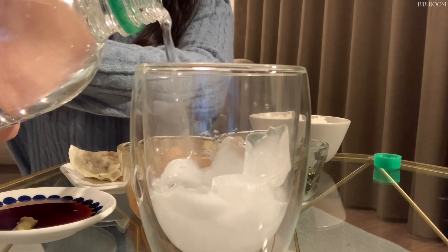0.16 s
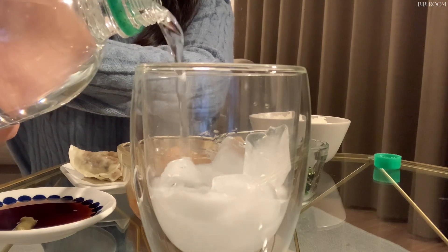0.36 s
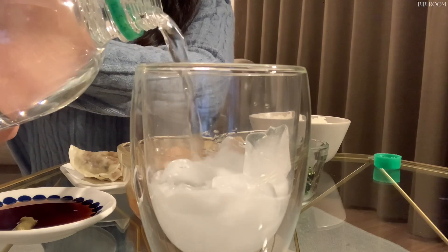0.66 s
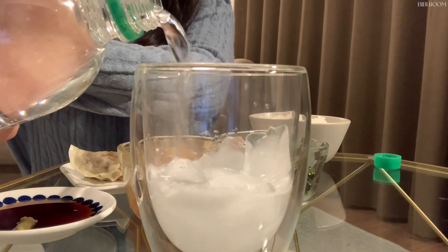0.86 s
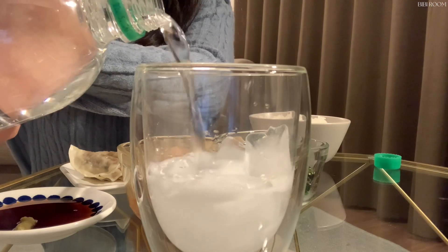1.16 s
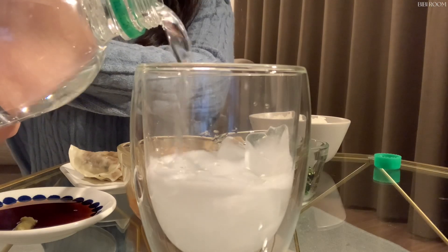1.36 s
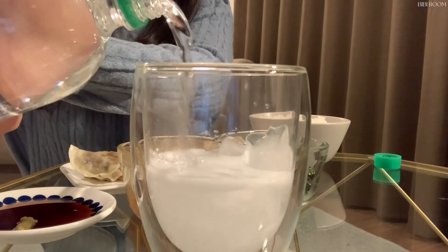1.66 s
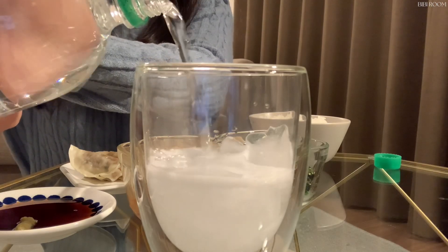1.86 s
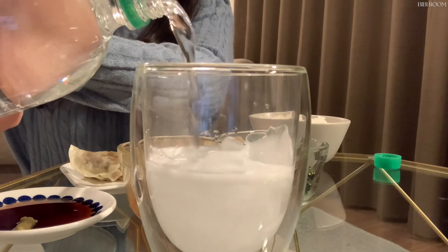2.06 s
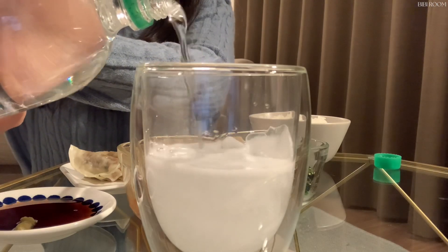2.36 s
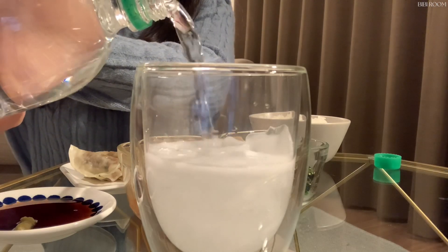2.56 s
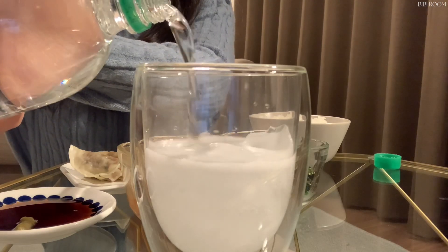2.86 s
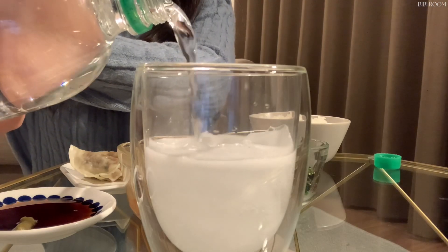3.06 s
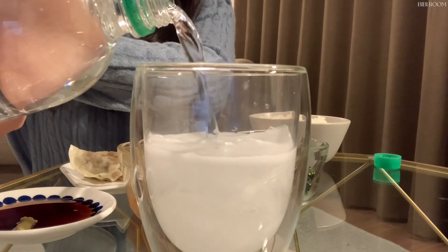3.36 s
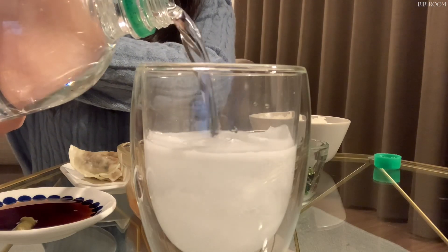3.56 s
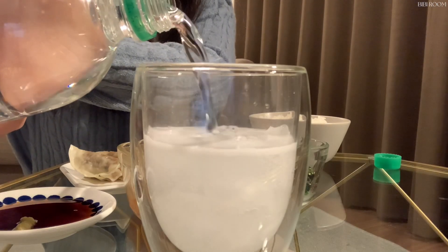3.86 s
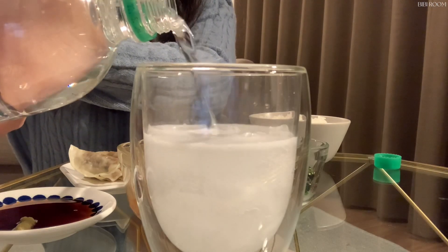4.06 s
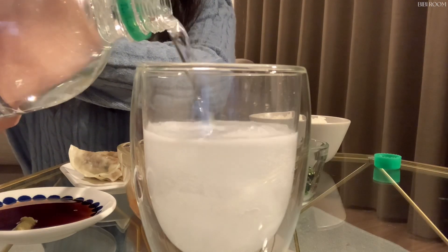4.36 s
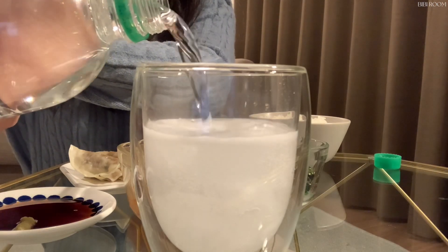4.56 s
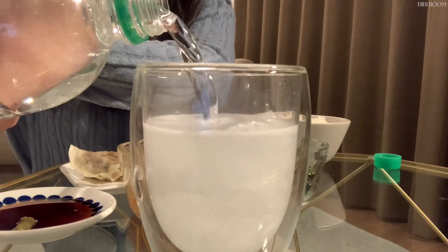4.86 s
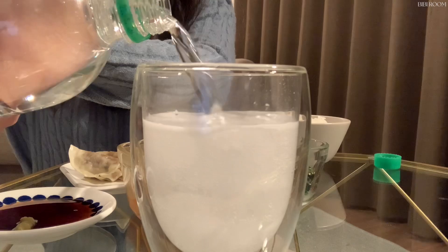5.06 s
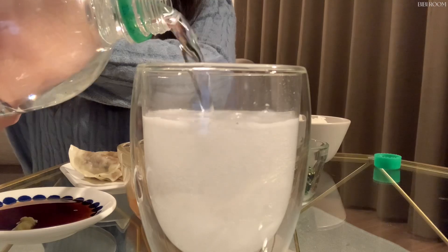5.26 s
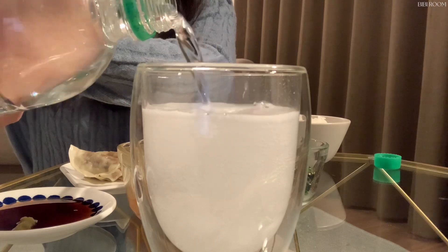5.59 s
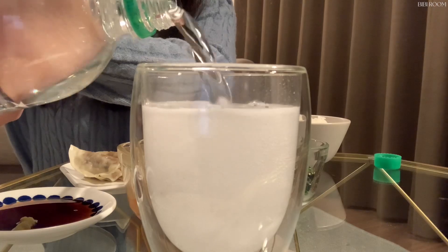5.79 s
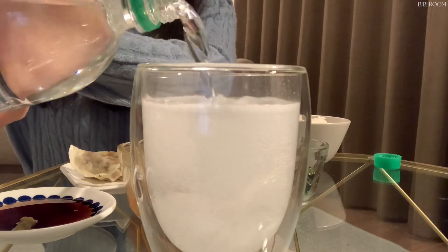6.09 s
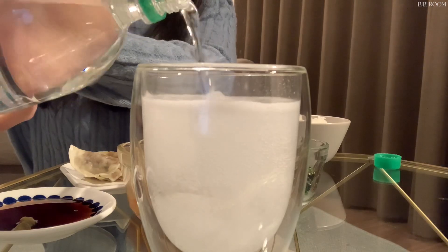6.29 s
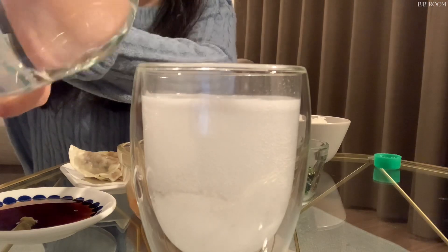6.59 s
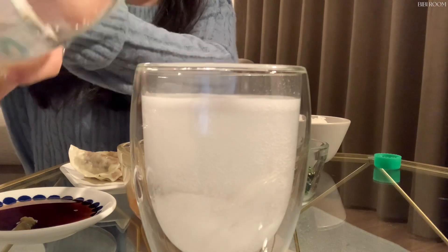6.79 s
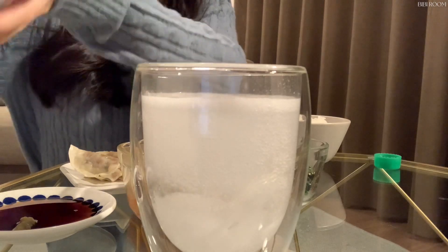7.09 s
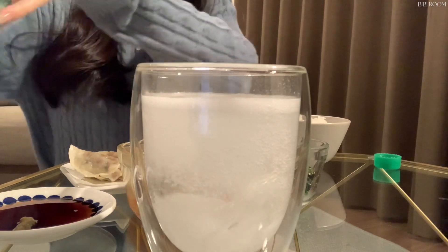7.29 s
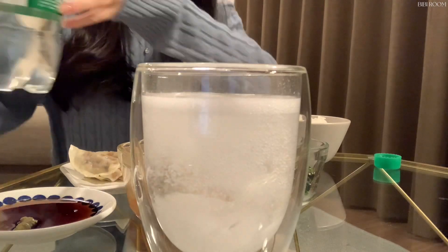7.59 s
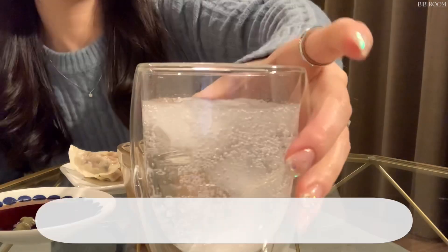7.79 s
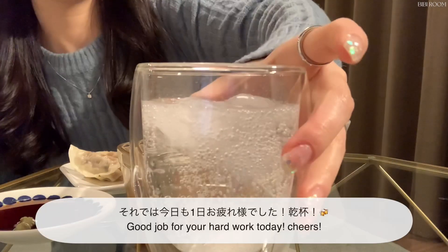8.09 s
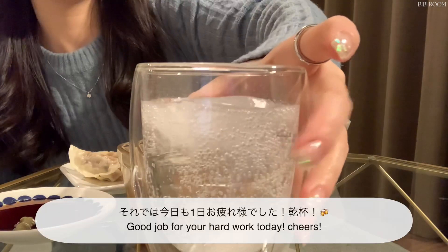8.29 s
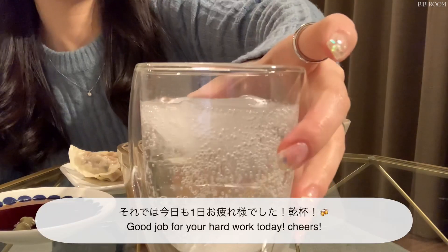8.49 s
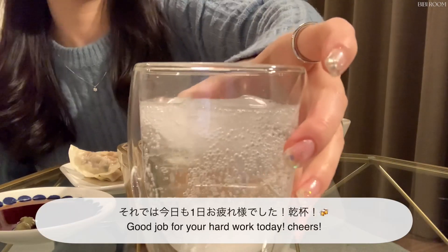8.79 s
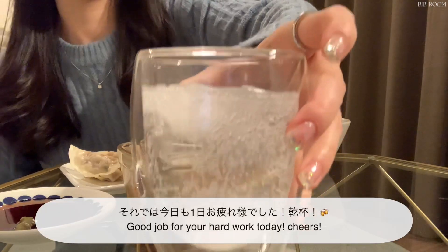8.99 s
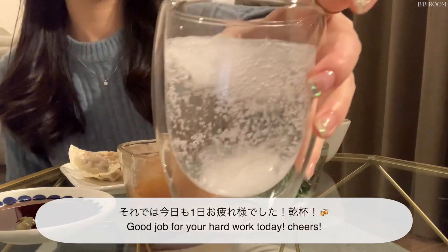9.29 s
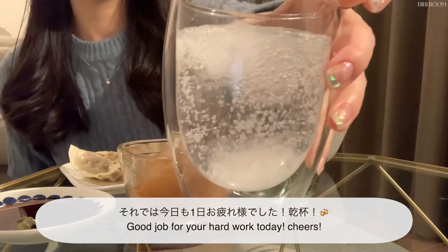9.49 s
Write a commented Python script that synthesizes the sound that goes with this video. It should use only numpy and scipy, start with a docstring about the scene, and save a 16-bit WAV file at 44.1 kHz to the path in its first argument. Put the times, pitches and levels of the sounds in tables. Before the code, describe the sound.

Close sparkling pour foams and crackles over knocking ice cubes, then an abrupt jump to faint fizz as fingernails tap and grip the glass.

```python
"""Sparkling water is poured over ice in a double-walled glass: random bubble bursts make its foam hiss,
and the shrinking air space above the foam shapes the hiss as a resonant pipe. The bottle glugs with swelling sine pulses.
Ice knocks as damped glass modes with noise; cracking ice and small popping bubbles are short noise ticks; a room hums.
Then the scene skips ahead: the foam has settled to a faint fizz, long nails tap the glass as a hand
takes hold of it, cubes clink, and the table gives one low thud."""
import sys
import numpy as np
from scipy import signal
from scipy.fft import rfft, irfft, next_fast_len
from scipy.io import wavfile
from scipy.ndimage import uniform_filter1d, map_coordinates

SR = 44100
rng = np.random.default_rng(int(sys.argv[2]) if len(sys.argv) > 2 else 0)


def generate_wav(sig):
    """Save sig (samples, or channels by samples) to the path in sys.argv[1] as 16-bit PCM at SR."""
    pcm = np.round(np.clip(np.atleast_2d(sig).T, -1, 1) * 32767).astype(np.int16)
    wavfile.write(sys.argv[1], SR, pcm)


N = 425124
SKIP_S = 7.698  # the moment at which the scene skips ahead


def amp(db):
    """Level law: decibels to amplitude gain."""
    return 10 ** (np.asarray(db) / 20)


def unit(x):
    """Power normalisation: scales to rms 1."""
    return x / np.sqrt(np.mean(x ** 2) + 1e-20)


def seconds():
    """Sampling: the time of every sample, in seconds."""
    return np.arange(N) / SR


def along(points, hz):
    """Logarithmic frequency: interpolates (frequency, value) points on a log axis."""
    f, v = np.transpose(points)
    return np.interp(np.log(hz + 1), np.log(f + 1), v)


def wobble(rate):
    """Slow random modulation: a smooth curve with so many random knots a second."""
    knots = rng.standard_normal(int(N * rate / SR) + 4)
    return map_coordinates(knots, [np.arange(N) * rate / SR])


def filtered(x, response):
    """Linear filtering: the spectrum of x times a complex response of frequency."""
    size = x.shape[-1]
    m = next_fast_len(size + 8192)
    return irfft(rfft(x, m) * response(np.fft.rfftfreq(m, 1 / SR)), m)[..., :size]


def coloured(x, spectrum):
    """Spectral shaping: filters x by (frequency, dB) points, then scales it to rms 1."""
    return unit(filtered(x, lambda hz: amp(along(spectrum, hz))))


def band(x, hz, octaves):
    """Causal band-pass filtering, so many octaves wide, around hz."""
    edges = np.clip(hz * 2 ** (np.array([-.5, .5]) * octaves), 20, SR / 2 - 100)
    return signal.sosfilt(signal.butter(2, edges, "band", fs=SR, output="sos"), x)


def decay(t, t60):
    """Exponential decay: the envelope falls by 60 dB in t60 seconds."""
    return amp(-60 * t / t60)


def noise_burst(t, t60):
    """Impact noise: white noise under an exponential decay."""
    return decay(t, t60) * rng.standard_normal(len(t))


def ring(modes, t, detune=0.023, scatter_db=2):
    """Modal superposition: damped sines with random strengths and slightly random pitches."""
    hz, db, t60 = np.transpose(modes)[:, :, None]
    size, shift = rng.standard_normal((2, len(modes), 1))
    envelope = amp(db + scatter_db * size - 60 * t / t60)
    return np.sum(envelope * np.sin(2 * np.pi * hz * (1 + detune * shift) * t), 0)


def swelling(t, swell_s, power):
    """Growth and decay: a power-law rise under an exponential fall."""
    return (t / swell_s) ** power * np.exp(-2 * t / swell_s)


def add(track, s, sound, db):
    """Linear superposition: adds a sound at time s with the given peak level."""
    part = track[round(s * SR):][:len(sound)]
    part += amp(db) * sound[:len(part)] / np.abs(sound).max()


def before_skip():
    """Linear cross-fade: 1 until 4 ms before the skip, falling to 0 at the skip."""
    return np.clip((SKIP_S - seconds()) / .004, 0, 1)


def bursts(rate, scatter_db):
    """Shot noise: bubble bursts as tiny impulses at random moments, of widely differing sizes."""
    chance, size = rng.random(N), rng.standard_normal((2, N))
    impulses = np.sign(size[0]) * amp(scatter_db * np.clip(size[1], -3, 2.5))
    return unit((chance < rate / SR) * impulses)


# Air space between foam and rim. Columns: time_s, depth_m
AIR_DEPTH = [(0, 0.059), (1, 0.057), (2, 0.053), (3, 0.051), (4, 0.046), (5, 0.035), (5.8, 0.025),
             (6.5, 0.024), (7.7, 0.013)]


def air_depth(s):
    """Moving boundary: depth in metres of the air space at time s."""
    return np.interp(s, *np.transpose(AIR_DEPTH))


def pipe_pitch(s, end_correction_m=0.017):
    """Quarter-wave resonance of the air column above the foam at time s."""
    sound_speed = 343  # m/s
    return sound_speed / (4 * (air_depth(s) + end_correction_m))


# Standing waves across the glass, with width and gain at full depth.
# Columns: pitch_hz (before the pipe's share), width_hz, gain_db, pipe_share (0-1), least_depth_m
CROSS_MODES = [(2627, 246, 11, 0.9, 0.019), (4496, 450, 10, 0.4, 0.015), (6400, 160, 1, 0.2, .004),
               (7300, 350, 4, 0.7, .004)]


def air_space(x, pipe_db=17, pipe_width_hz=470, pipe_fade=2.54, wall_m=0.011, cross_fade=0.45,
              shade_db=16, patchy_db=2.0):
    """Air-column resonance: as the space above the foam shrinks, its modes rise, weaken and broaden."""
    hz, t, spectrum = signal.stft(x, SR, nperseg=512)
    hz = hz[:, None]
    depth = air_depth(t)
    deep = depth / depth.max()
    pipe_hz = pipe_pitch(t)

    def bell(centre, width):
        """Resonance curve: broader in a shallower space."""
        return 1 / (1 + (2 * (hz - centre) * deep / width) ** 2)

    db = pipe_db * deep ** pipe_fade * bell(pipe_hz, pipe_width_hz)
    # crosswise waves need walls above the foam and vanish near the rim
    for cross_hz, width, gain_db, pipe_share, least_m in CROSS_MODES:
        walled = np.clip((depth - least_m) / wall_m, 0, 1) * deep ** cross_fade
        db = db + gain_db * walled * bell(np.hypot(cross_hz, pipe_share * pipe_hz), width)
    # below the first crosswise wave, little sound escapes from a deep glass
    db = db - shade_db * deep ** 19.0 / (1 + (hz / 2550) ** 16)
    # random patches of gain, smoothed over frequency and time, make the hiss uneven
    patches = uniform_filter1d(rng.standard_normal(spectrum.shape), size=4, axis=0)
    patches = uniform_filter1d(patches, size=7, axis=1)
    db = db + patchy_db * unit(patches)
    return unit(signal.istft(spectrum * amp(db), SR, nperseg=512)[1][:N])


POUR_END_S = 6.2  # the foam builds up until the bottle is taken away, then subsides


def foam_level(end_db, rise, fall):
    """Growth and collapse: level in dB, rising and then falling at constant rates in dB per second."""
    t = seconds() - POUR_END_S
    return end_db + np.minimum(rise * t, -fall * t)


# Spectrum of the coarse bubbles before the air space. Columns: frequency_hz, density_db (per Hz, relative)
COARSE_SPECTRUM = [(300, -10.5), (700, -7.5), (1100, -2.5), (2100, 1.5), (3000, 2), (3600, 2), (4150, -3.5),
                   (5600, -8.5), (6800, -5), (7500, -5), (8300, -20.5), (16000, -41)]
# Spectrum of the fine spray. Columns: frequency_hz, density_db (per Hz, relative)
FINE_SPECTRUM = [(2000, -40), (5000, -14), (8000, -3.5), (8700, 1.5), (9800, 1), (10700, 0), (11800, -3),
                 (12900, -4.3), (13900, 0), (15000, 0), (15900, -1.5), (16500, -40)]


def foam(open_db=1.67, open_depth_m=0.032, flutter_db=0.91, drift_db=0.8):
    """Shot noise through a resonator: coarse bubbles crackle inside the glass; fine spray hisses above it."""
    # coarse bubbles gain open_db each time the air space halves from open_depth_m
    opening = open_db * np.log2(open_depth_m / air_depth(seconds()))
    coarse_level = foam_level(end_db=-43, rise=0.78, fall=0.1) + opening
    fine_level = foam_level(end_db=-48.5, rise=1.6, fall=1)
    surge = flutter_db * wobble(25) + drift_db * wobble(5.5)
    coarse = air_space(coloured(bursts(rate=5000, scatter_db=4.5), COARSE_SPECTRUM))
    fine = coloured(bursts(rate=13000, scatter_db=2.0), FINE_SPECTRUM)
    return amp(coarse_level + surge) * coarse + amp(fine_level + surge) * fine


# Spectrum of the stream on bare ice. Columns: frequency_hz, density_db (per Hz, relative)
SPLASH_SPECTRUM = [(3500, -2.5), (5000, 3), (6400, 14.5), (7700, -1.5), (8700, -1), (10500, -6.5),
                   (12600, -15), (14900, 5), (16200, -23)]


def splash(start_db=-55, fall_db_per_s=2.5):
    """Impact shot noise: the stream sizzles on bare ice, fading as the drink covers the cubes."""
    sizzle = coloured(bursts(rate=7100, scatter_db=8.5), SPLASH_SPECTRUM)
    return amp(start_db - fall_db_per_s * seconds()) * sizzle


# Spectrum of the settled drink. Columns: frequency_hz, density_db (per Hz, relative)
FIZZ_SPECTRUM = [(800, -11), (2500, 3), (4100, -4.5), (4600, -4.5), (5200, -7), (6500, -7), (7200, 4),
                 (8100, -3), (9000, 2.5), (12600, -5), (15200, -2)]


def settled_fizz(fizz_db=-73, flat_db_per_s=2.5, grab_s=8.14, stir_db=8, stir_rise_s=0.12, stir_fall_s=0.37,
                 prickle_db=-7):
    """Sparse shot noise: a faint fizz goes flat, flares as the grip shakes bubbles loose, and prickles."""
    t = seconds()
    stir = np.exp(np.minimum((t - grab_s) / stir_rise_s, (grab_s - t) / stir_fall_s))
    level = fizz_db - flat_db_per_s * (t - SKIP_S) + stir_db * stir
    fizz = coloured(bursts(rate=4000, scatter_db=2.0), FIZZ_SPECTRUM)
    # a few larger bubbles
    prickle = unit(band(bursts(rate=50, scatter_db=1), 4600, octaves=0.16))
    return amp(level) * (fizz + amp(prickle_db) * np.sqrt(stir) * prickle)


# Narrow resonances among the table and dishes around the glass. Columns: pitch_hz, width_hz, gain_db
SURROUNDING_MODES = [(1510, 40, 9), (1540, 30, 6), (1776, 30, 5), (2017, 54, 10), (2277, 30, 8.5),
                     (2486, 35, 7.5), (2805, 35, 5), (3090, 50, 5), (3424, 62, 5), (4570, 85, 5)]


def surroundings(hz):
    """Sympathetic resonance: gain of the objects around the glass at each frequency."""
    db = sum(gain_db / (1 + (2 * (hz - centre) / width) ** 2) for centre, width, gain_db in SURROUNDING_MODES)
    return amp(db)


def hiss():
    """Diffuse field: foam, then fizz, each with a steady wash of bubbles unrelated left and right."""
    early = before_skip()
    direct, *wash = [early * (foam() + splash()) + (1 - early) * settled_fizz() for _ in range(3)]
    return placed(direct, filtered(np.array(wash), surroundings), diffuse_db=-1)


# Air gulped into the bottle, lower as it empties. Columns: start_s, level_db (relative peak), pitch_hz (settled)
GULPS = [(0.22, -36, 282), (.51, -41, 273), (0.752, -36, 259), (1.265, -36, 260), (1.558, -36.5, 262),
         (1.908, -34.5, 257), (2.362, -36, 248), (4.153, -40, 192), (5.153, -37.5, 192), (5.612, -36, 192),
         (5.962, -34, 191)]


def bottle(glug_db=-2, swell_s=0.01, bend=0.63, bend_s=0.0069):
    """Volume resonance: a gulp of air swells in the neck, and its pitch drops as it grows."""
    track, t = np.zeros(N), np.arange(SR // 6) / SR
    for s, db, hz in GULPS:
        phase = 2 * np.pi * np.cumsum(hz * (1 + bend * np.exp(-t / bend_s))) / SR
        add(track, s, swelling(t, swell_s, power=3) * np.sin(phase), db + glug_db)
    return track


# Ice knocking under water. Columns: start_s, level_db (relative peak), pitch_hz, snap_db (relative)
ICE_KNOCKS = [(1.197, -30, 1150, -16), (1.755, -24, 1280, -16), (2.097, -30.5, 1650, -7),
              (2.18, -29.5, 1790, 1), (2.202, -35, 1110, -10), (2.313, -29, 1300, -2),
              (2.731, -32, 1100, -17), (2.801, -24, 1350, -13), (3.238, -30, 1490, -10),
              (3.27, -24, 1260, -13), (3.287, -33, 1080, -14), (3.3, -35, 1290, -10),
              (3.314, -32, 1250, -6), (3.327, -34, 1270, -12), (3.399, -37, 1100, -15),
              (3.465, -31, 1350, -1), (3.658, -32, 1040, -12), (4.425, -34.5, 1150, -15),
              (4.729, -32, 1310, -15), (4.781, -23.5, 1570, -18), (4.793, -33, 1520, -20),
              (4.909, -33, 1330, -13), (5.7, -19.5, 1380, -9), (5.716, -31, 1660, -8),
              (5.889, -15.5, 1850, -4), (5.901, -29, 2210, -1), (6.331, -28.5, 1300, -10),
              (6.391, -24.5, 1060, -8), (6.461, -35, 1850, -7), (6.53, -35, 1060, -10)]


def contacts(rebound_s=0.016, rebound_db=-23, jostle_count=12):
    """Repeated impact: rows for each knock, its softer rebound, and faint jostles at random moments."""
    rebounds = [(s + rebound_s * rng.uniform(0.524, 2), db + rebound_db, hz, snap_db)
                for s, db, hz, snap_db in ICE_KNOCKS]
    # the stream moves the floating cubes
    jostles = [(rng.uniform(1.8, 6.6), -44.5 + rng.normal(0, 2), 1250 * rng.lognormal(0, 0.33), -8)
               for _ in range(jostle_count)]
    return list(ICE_KNOCKS) + rebounds + jostles


# Modes of the filled glass, before each knock's random loading. Columns: pitch_hz, level_db (relative), t60_s
GLASS_MODES = [(760, -0.5, 0.039), (930, 3.5, 0.028), (1150, 2, 0.024), (1350, 2, 0.021), (1590, -8, 0.018),
               (1850, -5, 0.016), (2160, 0, 0.022), (2600, -14, 0.015)]


def ice(knock_db=5.5, thud_hz=1300, thud_octaves=1.66, ping_db=-1, ping_t60=0.019, grit_db=-5, grit_t60=0.026,
        rattle_db=-19, rattle_t60=0.067, snap_hz=2300, snap_t60=0.011, spread=0.03):
    """Impact excitation of modes: cubes thud, ping, scrape and snap on the glass, dulled by the water."""
    track, t = np.zeros(N), np.arange(SR // 8) / SR
    water = signal.butter(3, [600, 4200], "band", fs=SR, output="sos")
    impulse = 1.0 * (t == 0)
    for s, db, hz, edge_db in contacts():
        load = np.exp(spread * rng.standard_normal())  # water and ice load the wall differently each time
        wall = unit(ring(GLASS_MODES, t * load))
        ping = amp(ping_db) * unit(ring([(hz, 0, ping_t60)], t, detune=0.0036))  # depends on the spot
        thud = unit(band(impulse, thud_hz, thud_octaves))
        grit = noise_burst(t, grit_t60) + amp(rattle_db) * noise_burst(t, rattle_t60)
        scrape = amp(grit_db) * unit(band(grit, hz, thud_octaves))
        snap = amp(edge_db) * unit(band(noise_burst(t, snap_t60), snap_hz, octaves=0.89))  # hard edges
        knock = unit(band(wall + thud, hz, octaves=3.3)) + ping + scrape
        add(track, s, signal.sosfilt(water, unit(knock) + snap), db + knock_db)
    return track


# Sharp dry ticks: cracking ice, before and after the skip, and small bubbles popping late on. # Columns:
# start_s, level_db (peak before placing), pitch_hz
DRY_TICKS = [(3.231, -29, 5400), (6.0715, -19, 6800), (8.569, -49, 9500), (8.59, -57, 11000),
             (8.645, -56, 12000), (8.868, -49, 9500), (8.991, -59, 12000), (9.274, -58, 12000)]


def dry_ticks(tick_t60=0.0076):
    """Sudden release: cracking ice, before and after the skip, and small popping bubbles late on give sharp
    ticks of band-passed noise."""
    track, t = np.zeros(N), np.arange(SR // 30) / SR
    for s, db, hz in DRY_TICKS:
        add(track, s, band(noise_burst(t, tick_t60), hz, octaves=1.7), db)
    return track


# Nails and fingertips on the glass.
# Columns: start_s, level_db (relative peak), snap_db (relative), click_db (relative)
NAIL_TAPS = [(7.999, -52, -7, -16), (8.008, -29, -5, -15), (8.085, -38, -30, -27), (8.1361, -23, -19, -11),
             (8.1498, -33, -8, -12), (8.192, -32.5, -33, -31), (8.247, -44, -25, -16),
             (8.289, -34.5, -21, -35), (8.3, -37.5, -9, -30), (8.498, -55, -32, -38),
             (9.298, -57, -34, -40), (9.602, -58, -37, -40.5)]
# Modes of the outer wall under a nail. Columns: pitch_hz, level_db (relative), t60_s
WALL_MODES = [(1005, 20.5, 0.037), (1210, 15, 0.022), (1450, 10.5, 0.014), (1770, 7, 0.013),
              (2080, 8, 0.018), (2480, 7, 0.011), (4700, -12, .012)]


def fingers(tap_db=2, snap_db=3, snap_hz=3480, snap_t60=0.0068, click_db=3, click_hz=7100, click_t60=0.0057,
            grit=0.71, grit_t60=0.016, edge_db=-9, edge_t60=0.0041):
    """Damped modal impact: each nail snaps and clicks on the outer wall, whose ring the hand damps at once."""
    track, t = np.zeros(N), np.arange(SR // 5) / SR
    high_pass = signal.butter(2, 750, "high", fs=SR, output="sos")

    def tick(t60, hz):
        """Single-mode decay: one damped sine at rms 1."""
        return unit(decay(t, t60) * np.sin(2 * np.pi * hz * t))

    for s, db, bright_db, treble_db in NAIL_TAPS:
        scrape = unit(band(noise_burst(t, grit_t60), 1550, octaves=1.1))
        body = unit(unit(ring(WALL_MODES, t)) + grit * scrape)
        snap = amp(snap_db + bright_db) * tick(snap_t60, snap_hz)
        edge = unit(band(noise_burst(t, edge_t60), 8700, octaves=.5))
        click = amp(click_db + treble_db) * (tick(click_t60, click_hz) + amp(edge_db) * edge)
        add(track, s, signal.sosfilt(high_pass, body + snap + click), db + tap_db)
    return track


# Floating cubes clinking as the glass is gripped. Columns: start_s, level_db (peak before placing), pitch_hz
CUBE_CLINKS = [(8.194, -45, 2420), (8.25, -48, 2400), (8.299, -53, 3200), (8.379, -62, 4640)]


def clinks(clink_t60=0.12, octaves=0.25):
    """Grazing contact: floating cubes touch with a brief, rough chink of narrow-band noise."""
    track, t = np.zeros(N), np.arange(SR // 5) / SR
    for s, db, hz in CUBE_CLINKS:
        add(track, s, band(noise_burst(t, clink_t60), hz, octaves), db)
    return track


def table_bump(s=8.015, db=-37, hz=68, swell_s=0.025):
    """Low-frequency impulse response: the hand nudges the table, which gives one soft thud."""
    track, t = np.zeros(N), np.arange(SR // 5) / SR
    add(track, s, swelling(t, swell_s, power=2) * np.sin(2 * np.pi * hz * t), db)
    return track * amp([[2], [-2]])  # louder on the left


# Spectrum of the room air. Columns: frequency_hz, density_db (per Hz, relative)
AIR_SPECTRUM = [(15, -17.5), (35, -6.5), (54, -5), (65, 3), (78, 0.5), (90, -4), (112, -11.5), (138, 0),
                (165, -14), (300, -13), (450, -17), (600, -21), (1100, -23.5), (1700, -37.5),
                (5000, -103.5)]
# Likeness of left and right in the room air. Columns: frequency_hz, correlation (0-1)
AIR_LIKENESS = [(60, 0.97), (140, 0.79), (300, 0.59), (600, 0.023), (2000, 0.052)]
# Balance of the room air. Columns: frequency_hz, left_minus_right_db
AIR_BALANCE = [(30, 2.7), (70, 5.8), (140, 2.5), (300, 3.5), (600, 1)]
# Swells of the room's rumble. Columns: centre_s, half_length_s, rise_db
RUMBLE_SWELLS = [(0.05, 0.17, 4), (2.653, 0.26, 3), (7.352, 0.17, 3.5)]


def room_air(early_db=-44.0, late_db=-53.0, rush_db=-42, late_rush_db=-54.0, creep_db_per_s=0.42, wander_db=1.0):
    """Room modes: ventilation drones in low resonances; the rumble wanders and swells under a steadier rush."""
    def turn(hz):
        """Partial coherence: the mixing angle that gives the wanted correlation."""
        return np.arccos(np.clip(along(AIR_LIKENESS, hz), -1, 1)) / 2

    noise = rng.standard_normal((2, N))
    mid, side = filtered(noise, lambda hz: np.array([np.cos(turn(hz)), np.sin(turn(hz))]))
    pair = np.array([mid + side, mid - side])
    pair = filtered(pair, lambda hz: amp(np.outer([.5, -.5], along(AIR_BALANCE, hz))))
    pair = coloured(pair, AIR_SPECTRUM)
    deep = filtered(pair, lambda hz: 1 / (1 + (hz / 180) ** 8))
    t, early = seconds(), before_skip()
    creep = creep_db_per_s * (t - SKIP_S / 2)  # slow rise up to the skip
    swell = wander_db * wobble(3.1)
    swell = swell + sum(db * np.exp(-((t - s) / half) ** 2) for s, half, db in RUMBLE_SWELLS)
    rumble = amp(swell) * (early * amp(early_db + creep) + (1 - early) * amp(late_db))
    rush = early * amp(rush_db + creep / 2) + (1 - early) * amp(late_rush_db)
    return rumble * deep + rush * (pair - deep)


# Decay of the diffuse tail. Columns: frequency_hz, t60_s
TAIL_DECAY = [(200, 0.28), (2000, 0.16), (12000, 0.039)]


def diffuse(x, size=4096):
    """Reverberation by convolution: a short diffuse tail of fading noise, drawn anew for each block."""
    blocks = np.pad(x, (0, -N % size)).reshape(-1, size)
    noise = rng.standard_normal((2, len(blocks), size))
    hz, t, spectrum = signal.stft(noise, SR, nperseg=256)
    fading = spectrum * decay(t, along(TAIL_DECAY, hz)[:, None])
    tails = signal.istft(fading, SR, nperseg=256)[1][..., :size]
    tails /= np.sqrt(np.mean(np.sum(tails ** 2, -1)))
    # convolve block by block; each end overlaps the next block
    spread = irfft(rfft(blocks, 2 * size) * rfft(tails, 2 * size))
    heads, ends = spread[..., :size].reshape(2, -1), spread[..., size:].reshape(2, -1)
    return heads[:, :N] + np.pad(ends, ((0, 0), (size, 0)))[:, :N]


# Phase of the direct part. Columns: frequency_hz, left_lead_rad (negative: right leads)
STEREO_PHASE = [(20, 0), (700, -1.1), (950, -1.5), (1210, -1.2), (1550, -1.25), (2300, -2.9), (3000, -2.9),
                (3620, -3.6), (4000, -4.5), (4500, -4.1), (5400, -5.4), (6300, -5), (6700, -4.3),
                (7400, -3.9), (7800, -3.14), (10100, -3.14), (10450, -2.1), (11100, -1.8), (11800, -0.9),
                (12500, 0), (16000, 0)]
# Balance of the close sounds. Columns: frequency_hz, left_minus_right_db
STEREO_BALANCE = [(300, 0), (1300, -3.3), (2000, -1), (2900, -3), (4000, -1.5), (7000, -1), (8000, 0)]
# Level of the diffuse part against the direct part, before each source's own share.
# Columns: frequency_hz, diffuse_db
DIFFUSE_SHARE = [(600, -2), (1400, -5), (2600, -5), (3600, -1), (6500, -1), (7450, -5), (7950, -45),
                 (10050, -45), (10500, -5), (12000, -6), (13000, -25)]


def placed(x, diffuse_part, diffuse_db):
    """Stereo phase and diffuse field: the direct part leads on the right; a diffuse part is mixed in by frequency."""
    def share(hz):
        """Diffuse-to-direct ratio: gain of the diffuse part at each frequency."""
        return amp(diffuse_db + along(DIFFUSE_SHARE, hz))

    direct = filtered(x, lambda hz: np.exp(1j * np.outer([.5, -.5], along(STEREO_PHASE, hz))))
    both = direct + filtered(diffuse_part, share)
    # dividing by the summed power keeps the level whatever the diffuse share
    return filtered(both, lambda hz: amp(np.outer([.5, -.5], along(STEREO_BALANCE, hz))) / np.hypot(1, share(hz)))


def scene(cubes_diffuse_db=-5, grip_diffuse_db=-7.0):
    """Superposition: the close sounds of drink, bottle, ice and hand, over the table thud and the room."""
    cubes, grip = ice() + dry_ticks(), fingers() + clinks()
    placed_cubes = placed(cubes, diffuse(cubes), cubes_diffuse_db)
    placed_grip = placed(grip, diffuse(grip), grip_diffuse_db)
    return hiss() + placed_cubes + placed_grip + bottle() + table_bump() + room_air()


def record(dry, top_hz=15850):
    """Band limiting: nothing is kept from top_hz upwards."""
    return filtered(dry, lambda hz: hz < top_hz)


dry = scene()
out = record(dry)
generate_wav(out)
```